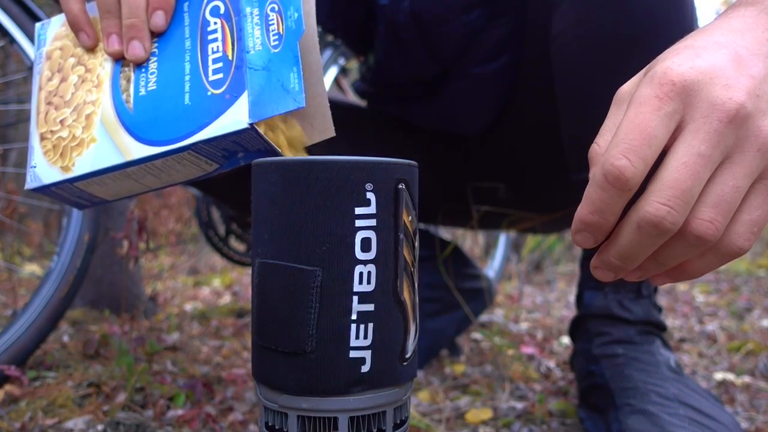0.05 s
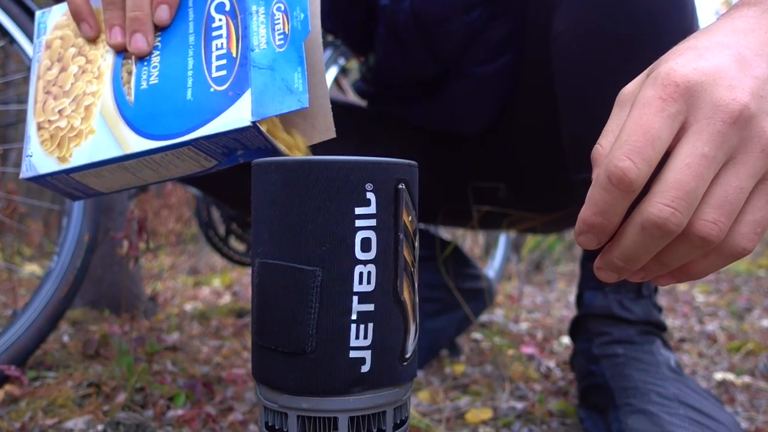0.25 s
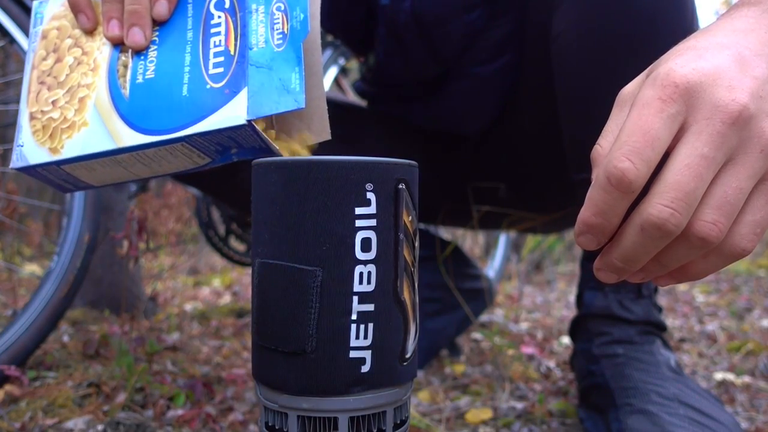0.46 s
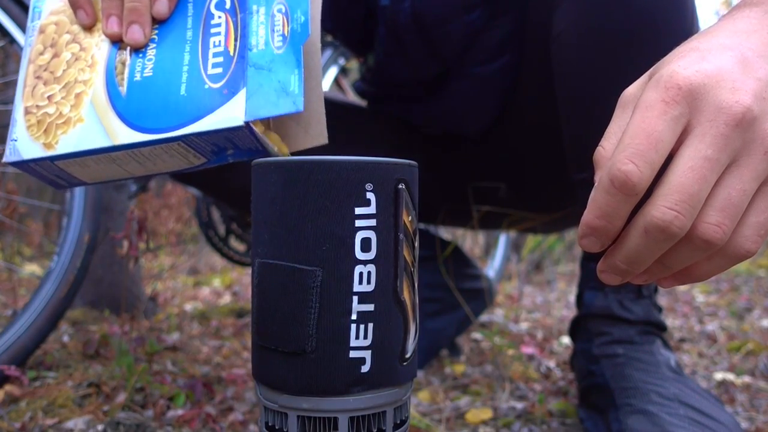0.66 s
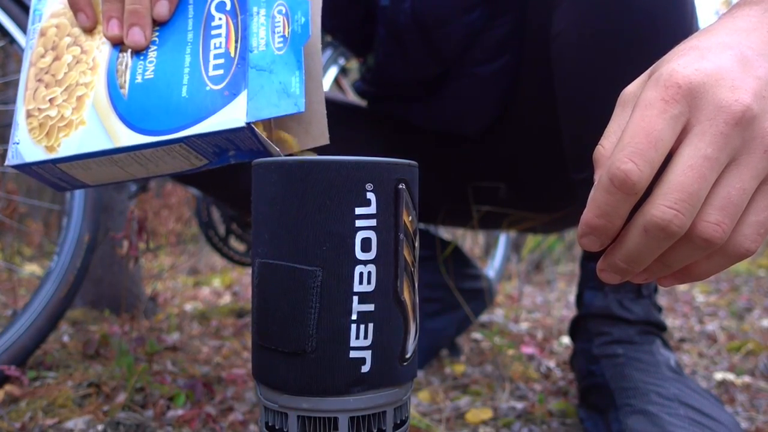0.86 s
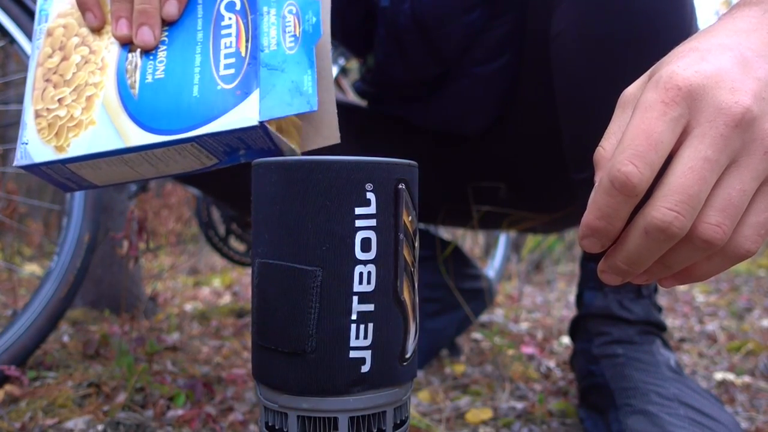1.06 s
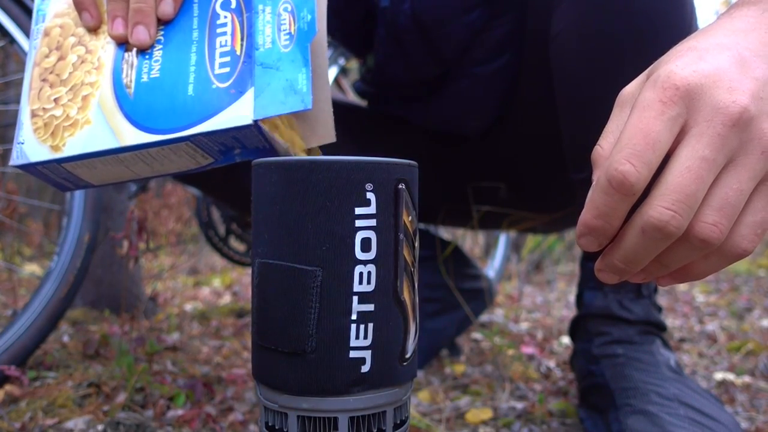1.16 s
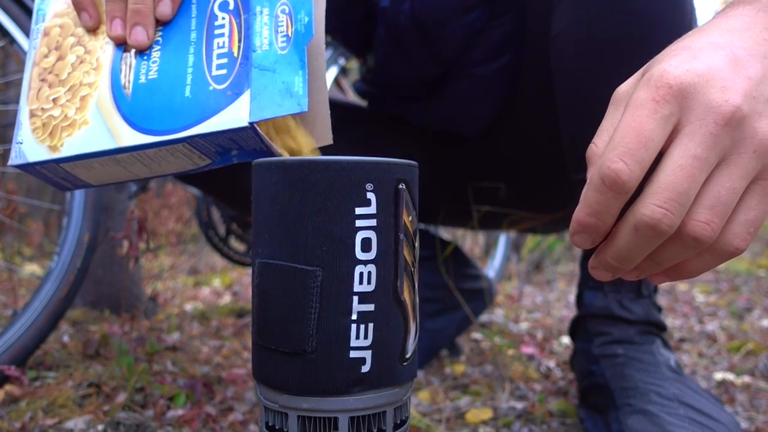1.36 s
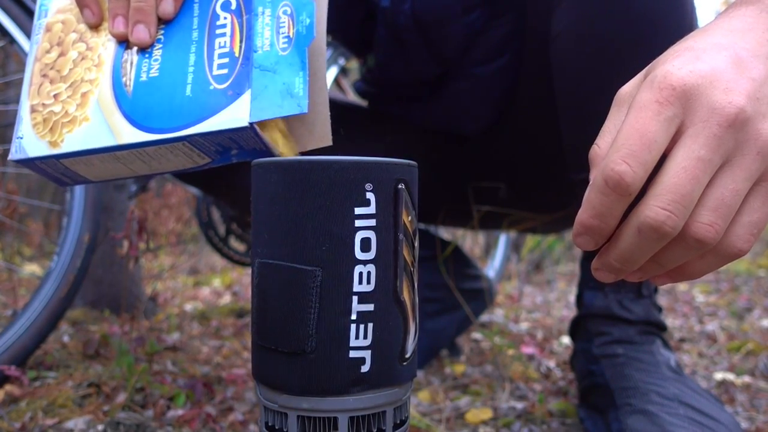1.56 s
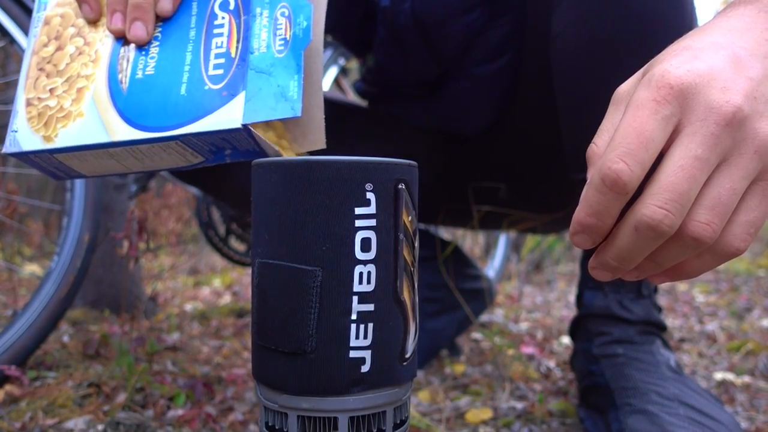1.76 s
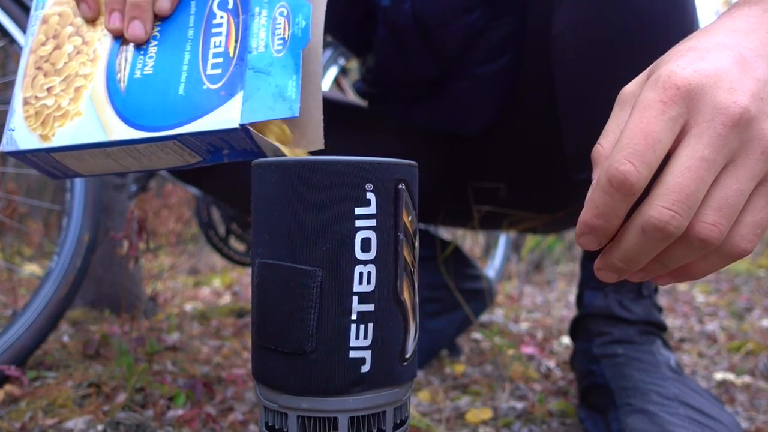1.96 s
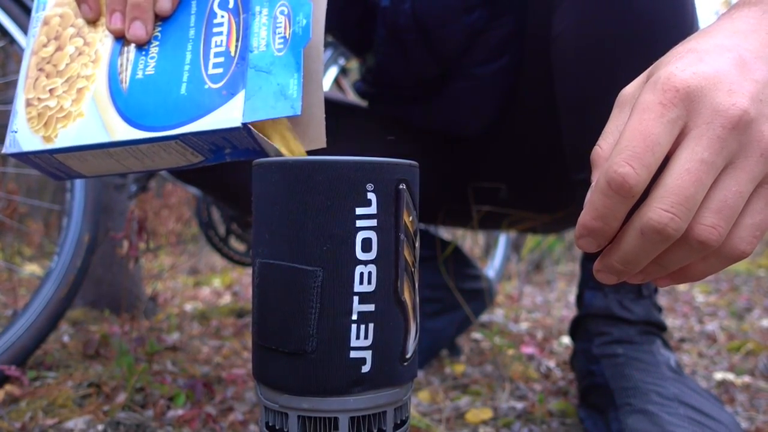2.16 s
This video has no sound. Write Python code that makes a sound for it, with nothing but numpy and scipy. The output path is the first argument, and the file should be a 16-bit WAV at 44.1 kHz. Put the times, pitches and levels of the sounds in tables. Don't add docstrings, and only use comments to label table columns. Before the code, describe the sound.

Dry pasta pieces pour from a cardboard box into a metal cup, rattling densely, close up outdoors

```python
import sys
import numpy as np
from scipy import signal
from scipy.fft import rfft, irfft, next_fast_len
from scipy.io import wavfile

SR = 44100
rng = np.random.default_rng(int(sys.argv[2]) if len(sys.argv) > 2 else 0)


def volts_from_db(level):
    exponent = np.asarray(level, float) / 20
    return 10 ** exponent


def pcm_store(signal):
    levels = np.round(np.clip(np.atleast_2d(signal), -1, 1) * 32767)
    wavfile.write(sys.argv[1], SR, levels.astype(np.int16).T)


N = 97637

# start_s, peak_db, centre_hz, deep_ring_db
LANDINGS = [(0.097, -23, 2030, -32), (0.1094, -19.5, 2740, -29), (0.2004, -21.5, 2210, -46),
            (0.2488, -23.5, 2200, -42), (0.3047, -26, 2140, -34), (0.3534, -18.5, 2780, -38),
            (0.3727, -25.5, 2220, -38), (0.386, -23, 2600, -37), (0.4146, -29, 2200, -35),
            (0.4344, -28, 2790, -41), (0.4438, -24.5, 2690, -40), (0.4766, -17, 2920, -38),
            (0.4944, -30, 2660, -31.5), (0.5131, -23, 2210, -36), (0.5176, -23.5, 2080, -40),
            (0.5773, -25.5, 1780, -36), (0.617, -26, 1730, -45), (0.6406, -23.5, 3240, -50),
            (0.6625, -27.5, 2130, -38), (0.6949, -20.5, 2180, -44), (0.7337, -19, 2740, -38),
            (0.7572, -28, 1400, -36), (0.7736, -19.5, 2360, -35), (0.7921, -37, 2130, -42),
            (0.8086, -24, 2260, -41), (0.817, -23, 1970, -32), (0.8324, -28.5, 2850, -36),
            (0.8413, -30, 2530, -36), (0.8452, -18.5, 1910, -32), (0.854, -18, 2410, -36),
            (0.8915, -23, 2220, -55), (0.9082, -26, 2730, -34), (0.9192, -21.5, 2110, -27.5),
            (0.9628, -21, 2240, -26.5), (0.9827, -20, 1690, -33), (1.0282, -23.5, 1800, -34),
            (1.1207, -32, 2240, -27.5), (1.1528, -19.5, 2770, -30), (1.2132, -28, 2260, -42),
            (1.2825, -17, 2620, -28), (1.3406, -22.5, 2170, -29), (1.489, -19, 2330, -40),
            (1.523, -30, 2480, -35), (1.5664, -19, 2200, -37), (1.662, -24, 2250, -30),
            (1.7134, -20, 2230, -38), (1.8447, -23, 2430, -34), (1.8965, -16.5, 2400, -49),
            (2.0545, -39, 2370, -33.5), (2.1879, -21, 2380, -36)]
HEAP_HZ, TUBE_HZ = np.geomspace(200, 4700, 30), np.geomspace(5100, 15700, 30)


def rms_one(x):
    return x / np.sqrt(np.mean(x ** 2) + 1e-20)


def at_hz(points, hz):
    table_hz, value = np.transpose(points)
    return np.interp(np.log(hz), np.log(table_hz + 1), value)


def filtered(x, order, cut_hz, kind):
    return signal.sosfilt(signal.butter(order, cut_hz, kind, fs=SR, output="sos"), x)


def flow(s, column):
    # start_s, knock_db, tick_re_knock_db, density (0-2), deep_ring_db
    flow_points = np.array([(0, -30, -11.5, 1.56, -0.3), (.105, -30.5, -11, 1.8, -1.5),
                            (.185, -36.5, -9.5, 0.93, 0), (.22, -34, -9, 1.14, -0.5),
                            (.29, -37.5, -12, 1, 1), (.35, -32, -10.5, 1.25, -1.5),
                            (.45, -36, -15, 0.87, -1.9), (.55, -40, -13.5, 0.59, 0),
                            (.65, -43.5, -12.5, 0.63, 2), (.8, -38.5, -11, 0.53, 2),
                            (.87, -40.5, -15, 0.67, 1.5), (1.0, -36.5, -14, 0.81, 1),
                            (1.17, -31.5, -13, 1.53, 1.1), (1.32, -32.5, -12.5, 1.68, -0.5),
                            (1.48, -31, -12.5, 1.77, 0), (1.66, -34, -13, 1.11, -1),
                            (1.75, -30.5, -14.5, 1.71, -3), (2.21, -30, -13, 1.88, -1)])
    return np.interp(s, flow_points[:, 0], flow_points[:, column])


def air():
    # freq_hz, density_db_per_hz
    air_colour = [(25, -22), (60, -8), (120, -9), (200, -1), (300, 6.5), (500, -31)]
    hz = np.maximum(np.fft.rfftfreq(N, 1 / SR), 1)
    common, own = rng.standard_normal(N), rng.standard_normal((2, N))
    own_share = 0.2 * (1 + 90 / hz)
    spectrum = (rfft(common) + own_share * rfft(own)) * volts_from_db(at_hz(air_colour, hz))
    stream_db = flow(np.arange(N) / SR, column=1)
    level_db = -68.5 + 1.1 * (stream_db - stream_db.mean())
    return volts_from_db(level_db) * rms_one(irfft(spectrum, N))


def strike(s, sizes, pitches_hz, t60s, colour_db, order=0):
    # freq_hz, likeness (0-1)
    port_likeness = [(200, 1), (800, 0.93), (2000, 0.96), (3200, 0.87), (4600, 0.7), (6000, 0.67),
                     (12000, 0.55), (14200, 0.1)]
    out = np.zeros((2, N))
    at = np.clip((s * SR).astype(int), 0, N - 1)
    draw = rng.standard_normal((len(s), len(pitches_hz), 3))
    for k, (hz, t60_s) in enumerate(zip(pitches_hz, t60s)):
        alike = np.clip(at_hz(port_likeness, hz), 0, 1)
        sign = order ** k if order else np.sign(draw[:, k, 1])
        size = sizes[:, k] * volts_from_db(colour_db * draw[:, k, 0])
        left = size * sign
        right = size * (alike * sign + np.sqrt(1 - alike ** 2) * draw[:, k, 2])
        clicks = np.array([np.bincount(at, left, N), np.bincount(at, right, N)]) + 1e-18
        r, w = volts_from_db(-60 / (t60_s * SR)), 2 * np.pi * hz / SR
        out += signal.lfilter([0, np.sin(w)], [1, -2 * r * np.cos(w), r * r], clicks)
    return out


def thuds():
    # start_s, peak_db
    base_hits = [(0.045, -60), (0.493, -44.5), (0.659, -52), (0.693, -48), (0.775, -44), (0.848, -47),
                 (0.919, -39), (0.962, -46), (1.176, -48), (1.357, -41), (1.522, -39), (2.048, -44)]
    s, db = np.transpose(base_hits)
    thump = strike(s, volts_from_db(db - 3)[:, None], pitches_hz=[387], t60s=[0.033], colour_db=0)
    return filtered(thump, 3, 215, "high")


def soft(x):
    return filtered(x, 8, 4545, "low")


def near(hz, centre_hz, width_oct):
    return np.exp(-.5 * (np.log2(hz / centre_hz[:, None]) / width_oct) ** 2)


def knock_modes():
    # freq_hz, density_db_per_hz
    heap_colour = [(200, -19), (400, -29.5), (650, -22.5), (930, -15), (1400, -14.5), (2300, -9.5),
                   (3300, -14.5), (4700, -22.5)]
    # freq_hz, height_db, t60_s
    cup_modes = [(831, -13, 0.04), (889, -9, 0.035), (969, -8, 0.029), (1039, -6.5, 0.02),
                 (1300, -16.5, 0.041), (1823, -8, 0.019), (2200, -8.5, 0.035), (2430, -6, .015),
                 (2833, -6.5, 0.026), (3670, -17, 0.031), (4210, -13, 0.024)]
    cup_hz, cup_db, cup_t60_s = np.transpose(cup_modes)
    heap_height = volts_from_db(at_hz(heap_colour, HEAP_HZ)) * HEAP_HZ / 2000
    heap_t60_s = 30.2 / HEAP_HZ
    return np.r_[HEAP_HZ, cup_hz], np.r_[heap_height, volts_from_db(cup_db - 5.5)], np.r_[heap_t60_s, cup_t60_s]


def tube_modes():
    # freq_hz, density_db_per_hz
    tube_colour = [(2820, -39), (4800, -6.5), (7150, -2.5), (8650, -4), (10100, -1), (12300, -6),
                   (14200, -26), (15100, -26), (16000, -16)]
    height = volts_from_db(at_hz(tube_colour, TUBE_HZ)) * TUBE_HZ / 10000
    return TUBE_HZ, height, 61 / TUBE_HZ


def singles(s, db, centre_hz, modes, width_oct, colour_db, damping, order=-1):
    bounce_s, bounce_loss_db = 0.001, 3.5
    hz, height, t60_s = modes
    turn = np.tile(np.arange(3), len(s))
    s, db, centre_hz = np.repeat([s, db, centre_hz], 3, axis=1)
    s = s + turn * bounce_s * rng.uniform(0.54, 1.5, len(s))
    colour = volts_from_db(colour_db * rng.standard_normal((len(s), len(hz))))
    tone = near(hz, centre_hz, width_oct) * height * colour
    tone = tone / np.linalg.norm(tone, axis=1, keepdims=True)
    size = volts_from_db(db - bounce_loss_db * turn)
    return strike(s, size[:, None] * tone, hz, damping * t60_s, 0, order=order)


def bright_ticks():
    # start_s, peak_db, ring_hz
    tick_events = [(0.0223, -30, 7870), (0.0722, -23, 9540), (0.1486, -24, 10800), (0.1992, -29, 7980),
                   (0.2159, -30, 9750), (0.2583, -27, 11900), (0.2843, -34, 5930), (0.3025, -25, 7950),
                   (0.339, -32, 9700), (0.3471, -31, 9380), (0.3721, -31, 9980), (0.386, -29, 7440),
                   (0.4609, -34, 7880), (0.4743, -27, 6400), (0.5167, -31, 6610), (0.5603, -17, 9900),
                   (0.601, -29, 10200), (0.6399, -36, 7630), (0.6614, -32, 8640), (0.689, -32, 8850),
                   (0.6943, -36, 8300), (0.7198, -34, 8280), (0.7198, -30, 10200), (0.733, -37, 7700),
                   (0.7731, -45, 8360), (0.7737, -35, 7370), (0.7866, -24.5, 10100), (0.817, -32, 6000),
                   (0.816, -25, 10100), (0.853, -23.5, 9200), (0.8749, -29, 10200), (0.889, -30, 7100),
                   (0.9443, -34, 7100), (0.9817, -34, 8750), (1.0296, -51, 9410), (1.0395, -36, 7100),
                   (1.063, -33, 9720), (1.0944, -34, 7710), (1.1194, -32, 7770), (1.1528, -33, 9570),
                   (1.1662, -29, 10200), (1.2555, -36, 11100), (1.282, -29, 9390), (1.3344, -27, 9650),
                   (1.3927, -45, 9910), (1.476, -26, 7000), (1.5245, -25, 9820), (1.5504, -27, 6940),
                   (1.6636, -37, 7250), (1.7055, -37, 9860), (1.7759, -24, 9730), (1.7908, -23, 11800),
                   (1.8233, -41, 9190), (1.8432, -34, 9100), (1.8861, -35, 10300), (1.9165, -24, 8900),
                   (1.925, -28, 10400), (1.9477, -24, 10600), (2.0767, -49, 9880), (2.1206, -28, 10500)]
    s, db, ring_hz = np.transpose(tick_events)
    return singles(s, db - 1, ring_hz, tube_modes(), width_oct=0.13, colour_db=0.95, damping=0.91)


def deep_ring():
    s, _, _, db = np.transpose(LANDINGS)
    return soft(strike(s, volts_from_db(db + 5.5)[:, None], pitches_hz=[940], t60s=[0.021], colour_db=0))


def landings():
    s, db, centre_hz, _ = np.transpose(LANDINGS)
    knock = singles(s + 0.0001, db - 7, centre_hz, knock_modes(),
                    width_oct=0.6, colour_db=4.1, damping=0.55, order=1)
    tick_hz = np.full(len(s), 8500.)
    tick = singles(s, db - 9, tick_hz, tube_modes(), width_oct=0.53, colour_db=3.7, damping=0.87)
    return soft(knock) + deep_ring() + tick


def drift(rate_hz):
    sos = signal.butter(1, [rate_hz / 3, rate_hz], "band", fs=SR, output="sos")
    return rms_one(signal.sosfilt(np.r_[sos, sos], rng.standard_normal(N + 8000))[8000:])


def stream(per_s, spread_db, clumps):
    count, clump_db = 12000, 1.3
    draw = rng.random((count, 4))
    s = draw[:, 0] * N / SR
    density = np.clip(flow(s, column=3), .05, 2)
    clump = volts_from_db(clump_db / np.sqrt(density) * clumps[(s * SR).astype(int)])
    rate = per_s * density * clump
    kept = np.clip((rate * N / SR / count - draw[:, 1]) * 50, 0, 1)
    uneven = volts_from_db(spread_db * np.minimum(-np.log(1 - draw[:, 2]), 4))
    return s, kept * uneven / np.sqrt(density), draw[:, 3]


def rattle():
    clumps, t = drift(70), np.arange(N) / SR

    s, size, pitch = stream(2600, 0.93, clumps)
    hz, height, t60_s = knock_modes()
    centre_hz = HEAP_HZ[0] * (HEAP_HZ[-1] / HEAP_HZ[0]) ** pitch
    tone = near(hz, centre_hz, width_oct=0.93)
    tone = tone * volts_from_db(np.outer(flow(s, column=4), hz < 1200))
    knocks = rms_one(soft(strike(s, np.outer(size, height) * tone, hz, t60_s, colour_db=3)))

    tick_s, tick_size, tick_pitch = stream(3080, 1.46, clumps)
    hz, height, t60_s = tube_modes()
    all_s, all_size = np.r_[s, tick_s], np.r_[0.35 * size, tick_size]
    all_pitch = np.r_[tick_pitch[::-1], tick_pitch]
    tone = near(hz, hz[0] * (hz[-1] / hz[0]) ** all_pitch, width_oct=0.19)
    ticks = rms_one(strike(all_s, np.outer(all_size, height) * tone, hz, t60_s, colour_db=-1.5))
    return volts_from_db(flow(t, column=1)) * (knocks + volts_from_db(flow(t, column=2)) * ticks)


def scene():
    pasta = rattle() + landings() + bright_ticks()
    return filtered(pasta, 2, 532, "high") + thuds() + air()


def band_limit(x):
    return signal.sosfilt(signal.butter(12, 16510, fs=SR, output="sos"), x)


def record(dry):
    # freq_hz, left_re_right_db
    port_balance = [(60, 1), (150, .5), (380, 1.5), (950, 3.5), (2380, 6.5), (4400, 7.5), (8000, 12.5),
                    (15000, 10.5)]
    # freq_hz, left_lead_rad
    port_lead = [(60, -.2), (250, -.7), (600, -1.2), (1500, -1.35), (3600, -.75), (4850, -2.1), (6000, -.6),
                 (10000, -.25)]
    size = next_fast_len(N + 2048)
    hz = np.maximum(np.fft.rfftfreq(size, 1 / SR), 1)
    half = volts_from_db(at_hz(port_balance, hz) / 2) * np.exp(.5j * at_hz(port_lead, hz))
    resonance = volts_from_db(9.5 * np.exp(-.5 * ((hz - 15140) / 250) ** 2))
    x = filtered(dry, 2, 60, "high")
    x = irfft(rfft(x, size) * resonance * np.array([half, 1 / half]), size)[:, :N]
    x = signal.sosfilt(signal.cheby2(16, 60, 16050, fs=SR, output="sos"), x)
    return band_limit(x)


dry = scene()
out = record(dry)
pcm_store(out)
```